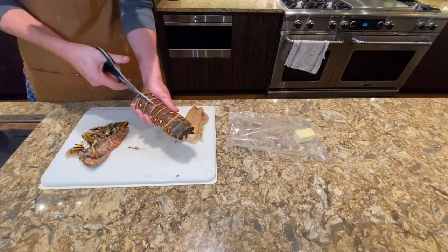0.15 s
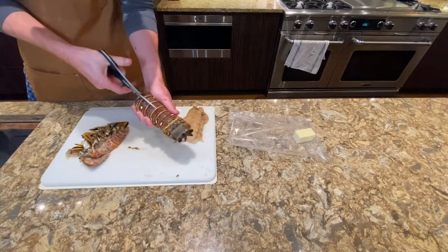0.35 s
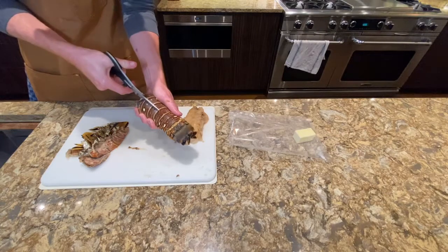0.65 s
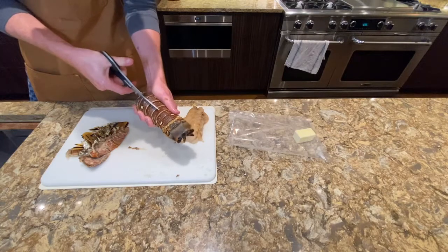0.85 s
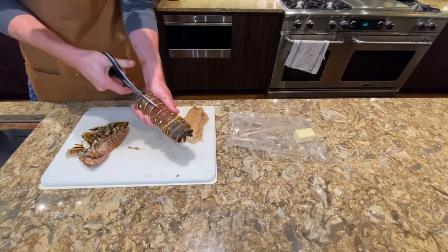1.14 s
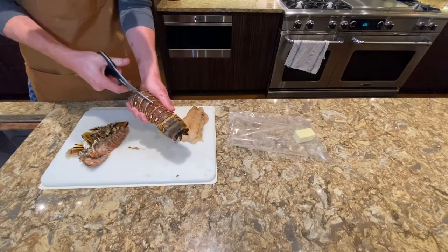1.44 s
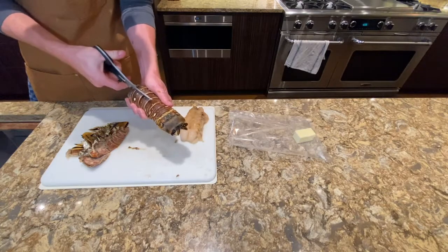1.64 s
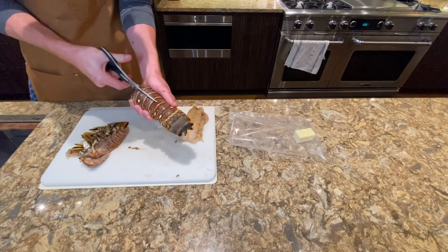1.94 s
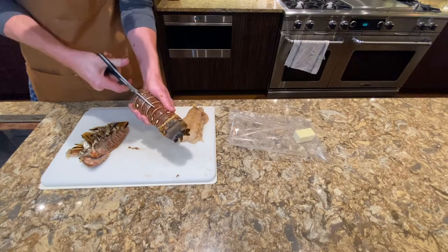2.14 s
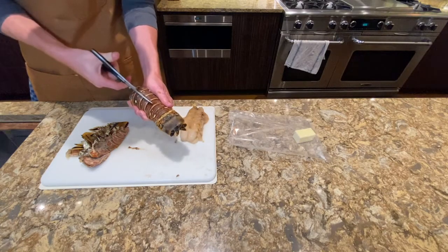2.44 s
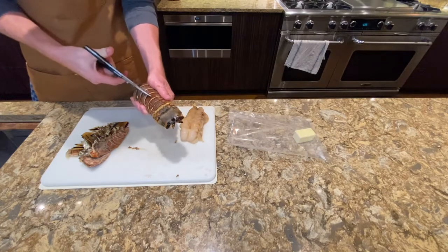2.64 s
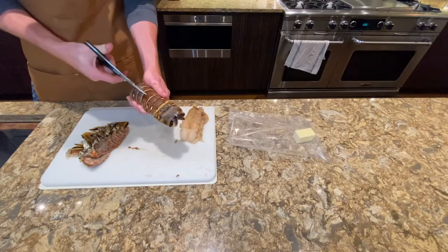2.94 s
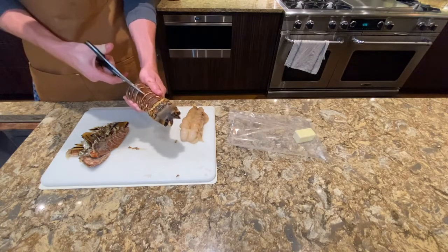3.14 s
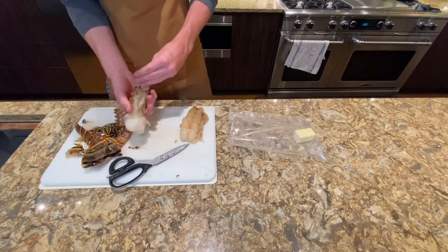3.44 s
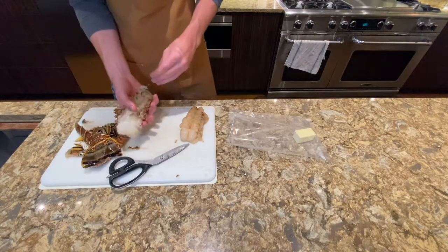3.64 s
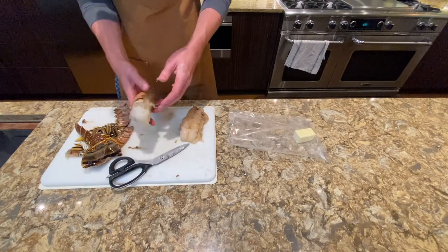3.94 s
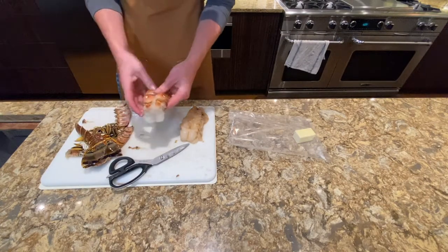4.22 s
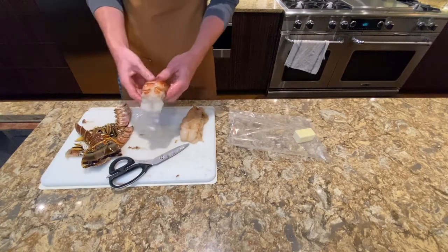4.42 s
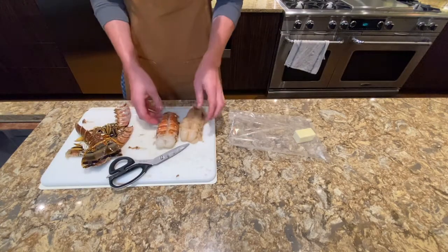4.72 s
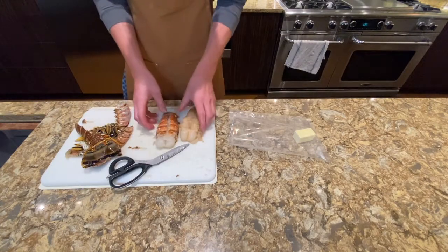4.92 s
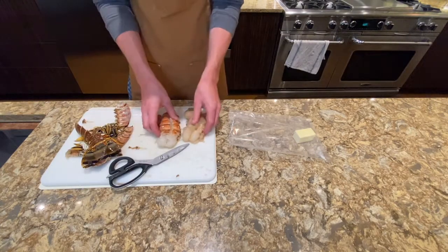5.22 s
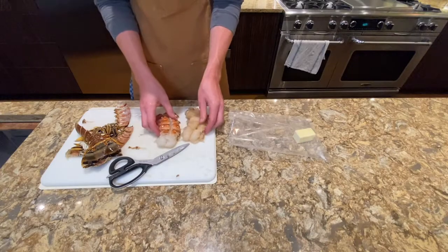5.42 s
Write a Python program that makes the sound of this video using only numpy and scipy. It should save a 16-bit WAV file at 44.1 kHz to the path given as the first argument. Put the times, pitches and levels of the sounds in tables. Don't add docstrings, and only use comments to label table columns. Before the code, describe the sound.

Close stereo microphone in a hard-surfaced home kitchen. Shears cut a lobster tail shell: several sharp, brittle crunches with bright splinters and short hollow knocks, with small blade ticks and dry scrapes between. The scene changes abruptly in mid-snip with a tiny low thud. Fingers then handle wet meat with faint sticky ticks and soft rubs, until one lower shell snap. Soft room air and appliance hum continue throughout.

```python
import sys
import numpy as np
from scipy import signal
from scipy.fft import rfft, irfft, next_fast_len
from scipy.io import wavfile
from scipy.ndimage import uniform_filter1d

SR = 44100
rng = np.random.default_rng(int(sys.argv[2]) if len(sys.argv) > 2 else 0)


def rack_gain(trim_db):
    fader = np.asarray(trim_db, float)
    return 10 ** (fader / 20)


def unload_wav(signal):
    wavfile.write(
        sys.argv[1],
        SR,
        np.round(np.clip(np.atleast_2d(signal).T, -1, 1) * 32767).astype(np.int16),
    )


N = 245616
CHANGE_S, FADE_S = 3.3375, 0.0024
SIZE, LEAD = 2048, 300
LONG = next_fast_len(N, True)
PATHS = 4


def pitches(size):
    return np.arange(size // 2 + 1) * SR / size


def shape(points, size):
    hz, db = np.transpose(points)
    gain_db = np.interp(np.log(pitches(size) + 1), np.log(hz), db, left=db[0] - 45, right=db[-1] - 41.5)
    return rack_gain(gain_db)


def resonance(centre_hz, sharpness, size):
    hz, centre = pitches(size) + 1, np.reshape(centre_hz, (-1, 1))
    return 1 / (1 + 1j * sharpness * (hz / centre - centre / hz))


def unit(x):
    return x / np.sqrt(np.mean(x ** 2))


def peak(x, db):
    loudest = uniform_filter1d(x ** 2, size=44, axis=-1).max(axis=-1, keepdims=True)
    return x * rack_gain(db)[:, None] / np.sqrt(loudest)


def lay(times, rows):
    out = np.zeros((2, PATHS, N + 2 * SIZE))
    for k, (s, row) in enumerate(zip(times, rows)):
        at = SIZE + int(s * SR) - LEAD
        out[int(s > CHANGE_S), k % PATHS, at:at + SIZE] += row
    return out[..., SIZE:SIZE + N]


# (pitch [Hz], level [dB per Hz])
AIR_BEFORE = [(110, -41), (190, -20), (460, -3), (703, -2), (869, -5), (1430, -2), (2140, -7.5), (2420, -7),
              (5870, -19.5), (12100, -31.5), (13000, -42)]
AIR_AFTER = [(110, -49), (190, -35), (243, -19), (329, -14), (359, -10.5), (917, -9), (1070, -11),
             (1190, -8.5), (1860, -13), (2300, -12.5), (13000, -38.5)]
# (pitch [Hz], level [dB per Hz])
RUMBLE = [(20, -13.5), (32, -12), (48, 1), (80, 2.5), (140, -2), (165, -9.5), (195, -26)]
# (pitch [Hz], left-right correlation [-1 to 1])
AIR_LIKENESS = [(60, 0.94), (130, 0.75), (290, 0.67), (640, -0.19), (1410, -0.39), (3100, 0.21),
                (6820, -0.3), (15000, 0.45)]
# (pitch [Hz], width [Hz], level [dB])
HUM_BEFORE = [(58.95, 2.5, -68), (100, 4, -74), (260.1, 9, -81.5)]
HUM_AFTER = [(55.8, 1.2, -77), (99.3, 2.75, -77), (119.2, 14, -74), (256.4, 8.4, -83.5)]


def air(spectrum, db, rumble_db, hums):
    hz = pitches(LONG)
    like_hz, like = np.transpose(AIR_LIKENESS)
    like = np.clip(np.interp(np.log(hz + 1), np.log(like_hz), like), -.95, .98)
    layers = [(shape(spectrum, LONG), db), (shape(RUMBLE, LONG), rumble_db)]
    for centre_hz, width_hz, hum_db in hums:
        layers.append((1 / (1 + (2 * (hz - centre_hz) / width_hz) ** 2), hum_db))
    power = sum(gain ** 2 / np.sum(gain ** 2) * rack_gain(2 * level_db) for gain, level_db in layers)
    mid, side = rfft(rng.standard_normal((2, LONG))) * np.sqrt(power * LONG / 2)
    common, opposed = np.sqrt(1 + like) * mid, np.sqrt(1 - like) * side
    left, right = rack_gain(-3.3) * (common + opposed), rack_gain(-2.7) * (common - opposed)
    return irfft(np.array([left, right]), LONG)[:, :N]


# (pitch [Hz], level [dB], time to fade by 60 dB [s])
ROOM = [(500, 6.5, .55), (1020, 3, 0.72), (1650, 2, .55), (2530, 1.5, 0.54), (4260, -2, 0.61),
        (7300, 0.5, 0.51), (10110, -3.5, 0.33), (14400, -7.5, 0.33)]
# (delay [ms], level over the tail [dB], spread [ms])
WALLS = [
    (.4, 16.5, 2.5),
    (7.7, 11, 1.2),
    (19, -5.5, 8.6),
]
# (left delay [ms], right delay [ms], level [dB])
COUNTER = [(.9, 1.1, -11), (2.6, 2.2, -17)]


def kitchen():
    size = 32768
    t, out = np.arange(size) / SR, np.zeros((PATHS, 2, size))
    ms = t * 1000
    hz = np.array(ROOM)[:, 0]
    noise = rfft(rng.standard_normal((PATHS, 2, size)))
    scattered = sum(rack_gain(db) * (ms > at) * np.exp(-np.abs(ms - at) / spread) for at, db, spread in WALLS)
    filling = np.clip(ms / 14, 0, 1)
    for k, (_, db, t60) in enumerate(ROOM):
        share = np.interp(np.log(pitches(size) + 1), np.log(hz), np.arange(len(hz)) == k)
        fade = rack_gain(-60 * t / t60) + rack_gain(-4.5) * rack_gain(-60 * t / 0.027)
        out += rack_gain(db - 36.5) * irfft(noise * share, size) * (filling * fade + scattered)
    for left_ms, right_ms, db in COUNTER:
        out[:, [0, 1], [int(left_ms * SR / 1000), int(right_ms * SR / 1000)]] += rack_gain(db)
    out[:, 0, 0] += 1
    out[:, 1, 8] += 1
    return rfft(out, LONG)


# (pitch [Hz], left minus right [dB])
LEFT_PORT = [(400, 3.5), (800, 5.5), (2400, 1.5), (5500, 4), (8000, 0.5), (15000, -2.5)]


def heard(source, room):
    tilt = np.sqrt(shape([(1, 0.0078)] + LEFT_PORT + [(SR, 0)], LONG))
    ports = np.sum(rfft(source, LONG)[:, None] * room, axis=0)
    return irfft(ports * np.array([tilt, 1 / tilt]), LONG)[:, :N]


def burst(count, length_ms):
    knots = rng.standard_normal((count, 24))
    steps = np.linspace(0, 23, SIZE // 2 + 1)
    lateness = np.array([np.interp(steps, np.arange(24), row) for row in knots])
    delay = LEAD + lateness * length_ms * SR / 1000
    return np.exp(-2j * np.pi * np.cumsum(delay, axis=1) / SIZE)


# (pitch [Hz], level [dB])
SPLINTER = [(6500, -10), (8000, -3), (10800, 2.5), (12400, -3.5), (14000, -15.5), (16000, -9.5)]


def snapped(push, snap_hz, snap_db, splinter_db):
    snap = irfft(push * np.abs(resonance(snap_hz, 1.16, SIZE)) ** 2, SIZE)
    splinter = irfft(push * shape(SPLINTER, SIZE), SIZE)
    return peak(snap, snap_db) + peak(splinter, splinter_db)


# (fullest at [s], level [dB], fading [dB per s], main pitch [Hz], brightness [dB])
RUBS = [
    (1.612, -55.5, 348, 4500, -9),
    (2.405, -48, 160.5, 3600, -9),
    (2.624, -48, 276, 3600, -8),
    (3.072, -69.5, 200, 4110, -10),
    (3.098, -49, 700, 4130, 1.5),
    (4.074, -67.5, 169.5, 5000, -8.5),
    (4.98, -64, 57.5, 5000, -2),
    (5.11, -63, 120, 5000, -3),
    (5.288, -69.5, 291.5, 5000, 5),
    (5.502, -61.5, 243, 5000, -15),
]


def rubs():
    slips = rfft(rng.standard_normal(LONG) * rack_gain(1.2 * rng.exponential(size=LONG)))
    bright = unit(irfft(slips * shape(SPLINTER, LONG), LONG)[:N])
    t, out = np.arange(N) / SR, np.zeros((2, PATHS, N))
    for s, db, fade_db, hz, bright_db in RUBS:
        dull = unit(irfft(slips * resonance(hz, 1.2, LONG)[0] ** 2, LONG)[:N])
        swell_db = np.minimum(650 * (t - s), fade_db * (s - t))
        out[int(s > CHANGE_S), 0] += rack_gain(db - 8.5 + swell_db) * (dull + rack_gain(bright_db) * bright)
    return out


# (time [s], snap level [dB], splinter level [dB])
BLADE_TICKS = [(0.1342, -39, -40.5), (0.1447, -41, -42.5), (0.3758, -52, -41), (0.508, -43, -43),
               (0.5202, -47, -59.5), (1.0572, -42, -45.5), (1.0637, -32.5, -43.5), (1.605, -56.5, -60),
               (1.6141, -49, -71), (1.7428, -58, -59.5), (1.7718, -58.5, -65), (1.8326, -55.5, -64),
               (1.8857, -42.5, -45), (2.3912, -52, -58), (2.4307, -47, -78), (2.196, -62.5, -47.5),
               (2.446, -46, -68), (2.6172, -49.5, -56)]
# (time [s], snap level [dB], splinter level [dB])
FINGER_TICKS = [(3.36, -56, -57), (3.492, -49, -52.5), (3.884, -63, -71), (4.077, -46.5, -71),
                (4.1002, -56, -61), (4.4997, -69, -50), (4.5332, -55, -60), (5.1144, -52.5, -63),
                (5.1294, -59, -57), (5.1812, -60, -71.5), (5.197, -67.5, -54.5), (5.27, -66.5, -58),
                (5.284, -51.5, -54), (5.3512, -67.5, -63), (5.3779, -56.5, -61), (5.3992, -53, -65.5),
                (5.4727, -57, -53.5), (5.4972, -49.5, -58), (5.5174, -61, -63.5)]


def ticks():
    s, snap_db, splinter_db = np.transpose(BLADE_TICKS + FINGER_TICKS)
    snap_hz = np.where(s < CHANGE_S, 3800, 4800)
    return lay(s, snapped(burst(len(s), .25), snap_hz, snap_db - 4.0, splinter_db - 0.3))


# (time [s], ring level [dB], ring pitch [Hz])
KNOCKS = [(0.1757, -29.5, 1356), (0.6149, -17.5, 1803), (0.636, -29, 1580), (0.647, -37.5, 804),
          (0.648, -26.5, 1548), (0.835, -41.5, 1670), (2.0793, -34.5, 1390), (2.4777, -41.5, 3600),
          (2.432, -54, 3870), (2.626, -56, 3620), (3.0653, -44, 1595), (3.0864, -36.5, 1780),
          (1.9862, -26.5, 1227), (1.9917, -15.5, 2290), (2.7015, -25.5, 1753), (3.0796, -34.5, 1620),
          (3.2942, -32, 1495), (4.6476, -29.5, 2010), (4.6493, -22, 1490), (4.6514, -33.5, 780),
          (4.6575, -32, 1230), (4.6532, -21, 988), (4.648, -24, 996)]


def knocks():
    s, ring_db, ring_hz = np.transpose(KNOCKS)
    silent_db = np.full(len(s), -200)
    return s, silent_db, silent_db, ring_hz, ring_db, ring_hz


# (time [s], snap level [dB], splinter level [dB], snap pitch [Hz], hollow ring level [dB])
LONE = [(0.0031, -31, -22.5, 2900, -31), (0.0106, -30, -27.5, 5800, -26.5), (0.0193, -25, -25.5, 5200, -46),
        (0.0287, -24.5, -28.5, 6500, -32), (0.1675, -26, -23, 7600, -48), (0.3944, -33.5, -32, 3700, -49),
        (0.4712, -39, -36, 5400, -61), (0.8483, -33, -53, 6600, -34.5), (0.8597, -36.5, -55, 5700, -38),
        (1.0757, -39, -42.5, 4900, -44), (1.0876, -30.5, -32, 7800, -48), (4.6438, -31.5, -49, 3450, -48),
        (3.3023, -77, -77, 2400, -43), (4.6386, -32.5, -41, 3230, -53.5)]


def lone_fractures():
    s, snap_db, splinter_db, snap_hz, ring_db = np.transpose(LONE)
    return s, snap_db, splinter_db, snap_hz, ring_db, np.full(len(s), 1782)


# (time [s], snap level [dB], splinter level [dB], snap pitch [Hz])
SNAPS = [(0.1737, -7.5, -37.5, 6840), (0.1782, -13.5, -23.5, 4870), (0.1813, -25.5, -10, 5430),
         (0.607, -39.5, -4, 5100), (0.6087, -19, -25, 4530), (0.6112, -21.5, -11.5, 5800),
         (0.6149, -24, -26.5, 3240), (0.6443, -28, -9.5, 5680), (0.6458, -14, -25, 5500),
         (0.648, -41, -41, 5500), (1.0921, -22, -19, 8600), (1.0929, -13, -17.5, 5270),
         (1.9816, -15.5, -16.5, 4400), (1.9837, -19.5, -25, 4300), (1.9862, -18, -33, 4900),
         (1.9887, -11.5, -35, 7000), (2.0793, -22, -24, 5870), (2.682, -29.5, -35, 3630),
         (2.6852, -29.5, -34, 6400), (2.6909, -27, -33, 3160), (2.7015, -33, -40, 3440),
         (3.0938, -41, -41, 4500), (3.101, -39, -35, 4400), (3.2942, -66.5, -33, 2760),
         (3.329, -35, -25, 4210), (3.3354, -37.5, -45, 4000), (4.6476, -20.5, -46, 2780),
         (4.6532, -17, -23, 5100)]


def loud_snaps():
    s, snap_db, splinter_db, snap_hz = np.transpose(SNAPS)
    start, _, crunch_db, hollow_db, hollow_hz = np.transpose(CUTS)
    cut = np.searchsorted(start - .003, s) - 1
    over_db = np.maximum(snap_db, splinter_db) - crunch_db[cut]
    return s, snap_db, splinter_db, snap_hz, hollow_db[cut] + 0.43 * over_db, hollow_hz[cut]


# (start [s], length [s], crunch level [dB], hollow ring level [dB], ring pitch [Hz])
CUTS = [(0.1684, 0.01092, -36.5, -36.5, 1784), (0.6085, 0.012, -31.5, -30.5, 1820),
        (0.6396, .005, -31, -38, 1610), (1.0912, 0.0044, -38.5, -34.5, 1720),
        (1.9801, 0.0091, -29.5, -32.5, 1510), (2.0755, 0.0043, -36, -36, 1400),
        (2.6828, 0.029, -39.5, -45, 1710), (3.0644, 0.047, -51, -41.5, 1743),
        (3.2884, 0.0047, -56, -50.5, 1590), (3.3253, 0.0076, -36, -37.5, 1740),
        (4.647, 0.01, -31, -29, 1022)]


def crunches():
    slots, gap_s = 15, .0027
    start, length, crunch_db, hollow_db, hollow_hz = np.array(CUTS).T[..., None]
    gap, size, fine, knock, tune = rng.standard_normal((5, len(CUTS), slots))
    slot = np.arange(slots)
    since = gap_s * (slot + .25 * gap * (slot > 0))
    stop_db = -15.5 * np.maximum(since - length, 0) * 1000
    s = (start + since).ravel()
    snap_db = crunch_db + stop_db + 2.5 * size
    splinter_db = crunch_db + stop_db - 3 + 2.5 * fine
    ring_db = hollow_db + stop_db - 0.5 * knock
    ring_hz = hollow_hz * (1 + .06 * tune)
    loud_s, _, _, loud_hz = np.transpose(SNAPS)
    snap_hz = np.interp(s, loud_s, loud_hz)
    return s, snap_db.ravel(), splinter_db.ravel(), snap_hz, ring_db.ravel(), ring_hz.ravel()


# (pitch [Hz], level [dB])
SMALL_BODY = [(120, -29.5), (250, -16.5), (450, -13), (750, -3.5), (1300, -3), (20000, 2.5)]


def cracks():
    kinds = [crunches(), loud_snaps(), lone_fractures(), knocks()]
    s, snap_db, splinter_db, snap_hz, ring_db, ring_hz = [np.concatenate(column) for column in zip(*kinds)]
    push = burst(len(s), .38)
    sharpness = 19 * (ring_hz[:, None] / 1750) ** 1.6
    cavity = resonance(ring_hz, sharpness, SIZE)
    wall = rack_gain(-18.5) * resonance(1.6 * ring_hz, 0.57, SIZE) ** 2
    ring = peak(irfft(push * (cavity + wall) * shape(SMALL_BODY, SIZE), SIZE), ring_db - 4.5)
    return lay(s, snapped(push, snap_hz, snap_db - .4, splinter_db - 6.5) + ring)


def scene():
    t, room = np.arange(N) / SR, kitchen()
    early, later = cracks() + ticks() + rubs()
    late = np.clip((t - CHANGE_S) / FADE_S, 0, 1)
    thud = rack_gain(-34.0) * np.clip((t - CHANGE_S) / 0.00013, 0, 1)
    motor = rack_gain(-59) * np.sin(2 * np.pi * 120.1 * t)
    before = heard(early, room) + air(AIR_BEFORE, -58, -70.0, HUM_BEFORE) + motor + thud
    after = heard(later, room) + air(AIR_AFTER, -60, -71.5, HUM_AFTER)
    return (1 - late) * before + late * after


def roll_off(x):
    return signal.sosfilt(signal.butter(12, 16850, fs=SR, output="sos"), x)


# (pitch [Hz], level [dB])
COLOUR = [(10, 0), (12500, -4.5), (13300, -11.5), (13900, 3.5), (15600, -1.5), (16100, -18.5),
          (16800, -46.5)]


def record(dry):
    coloured = irfft(rfft(dry, LONG) * shape(COLOUR, LONG), LONG)[:, :N]
    return roll_off(coloured)


dry = scene()
out = record(dry)
unload_wav(out)
```